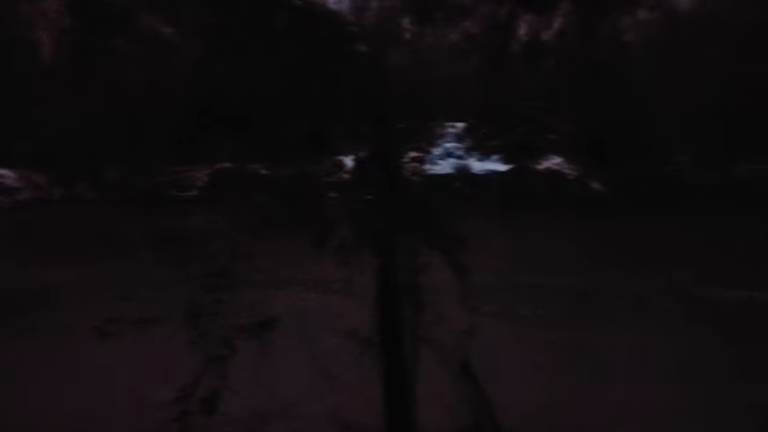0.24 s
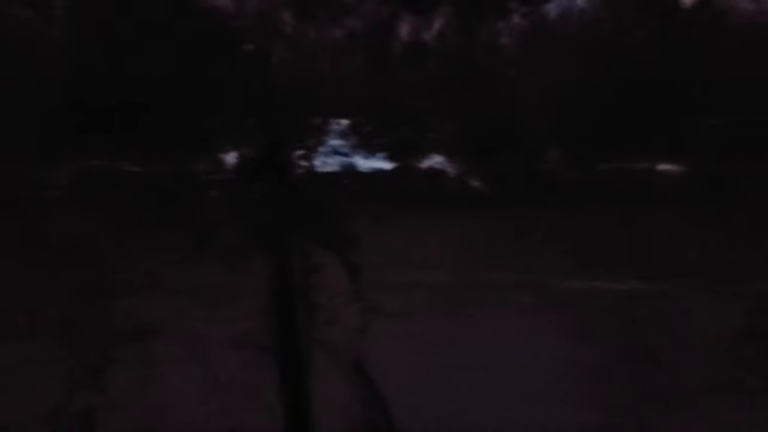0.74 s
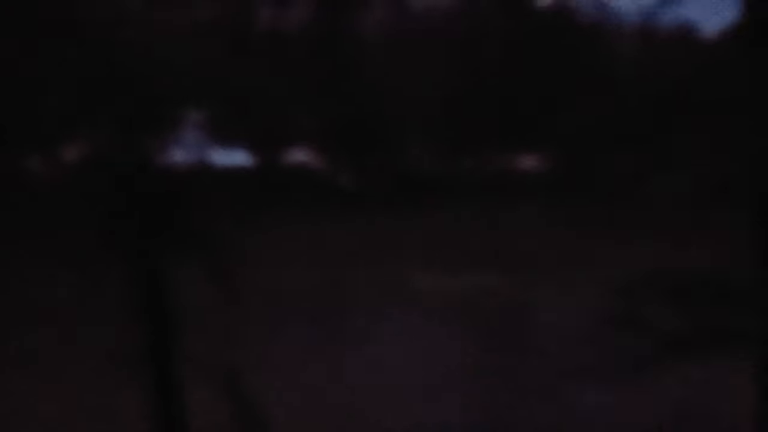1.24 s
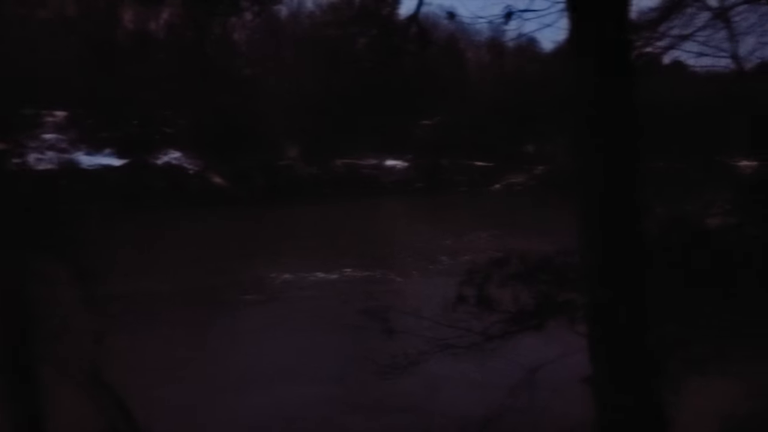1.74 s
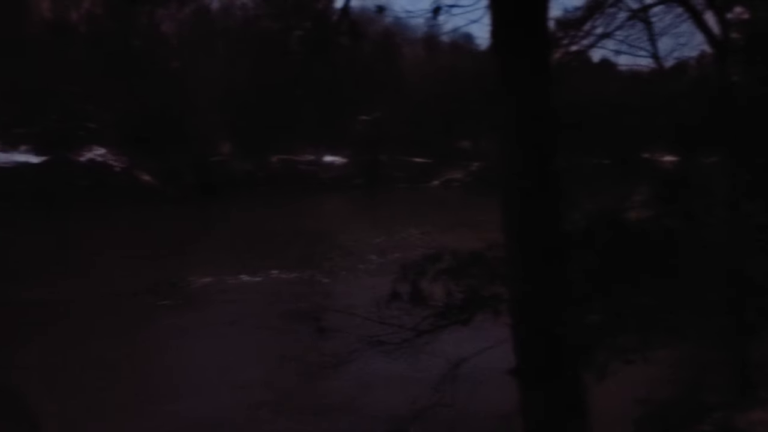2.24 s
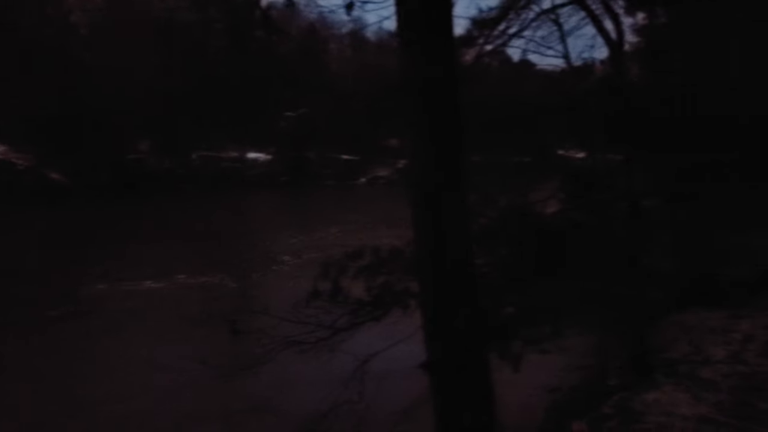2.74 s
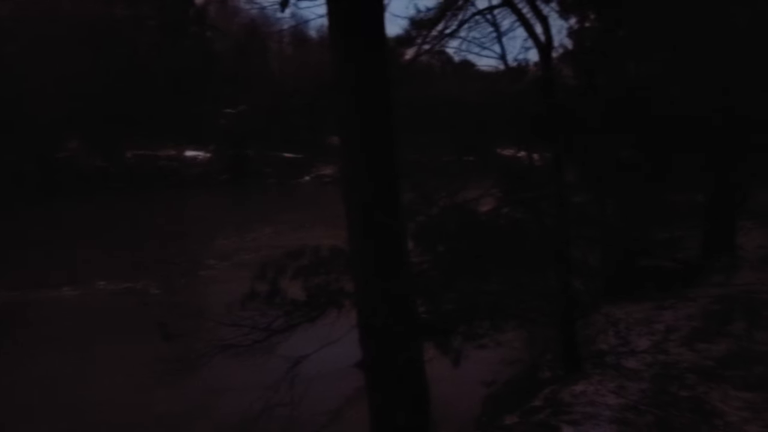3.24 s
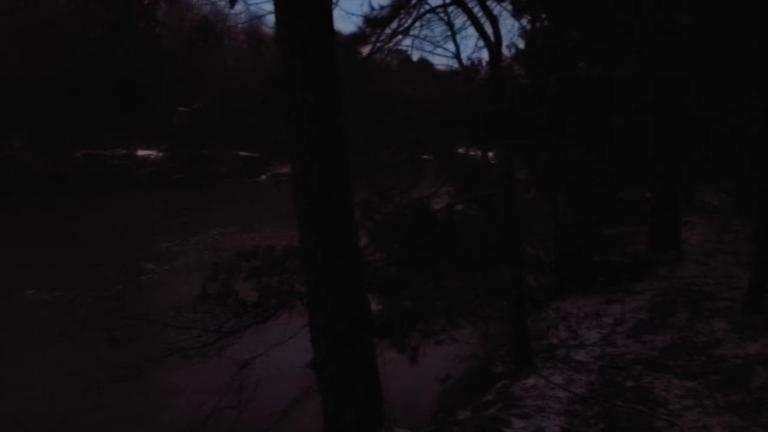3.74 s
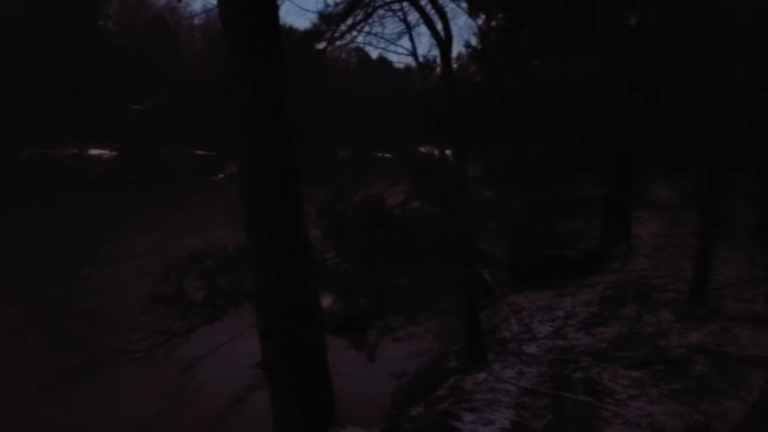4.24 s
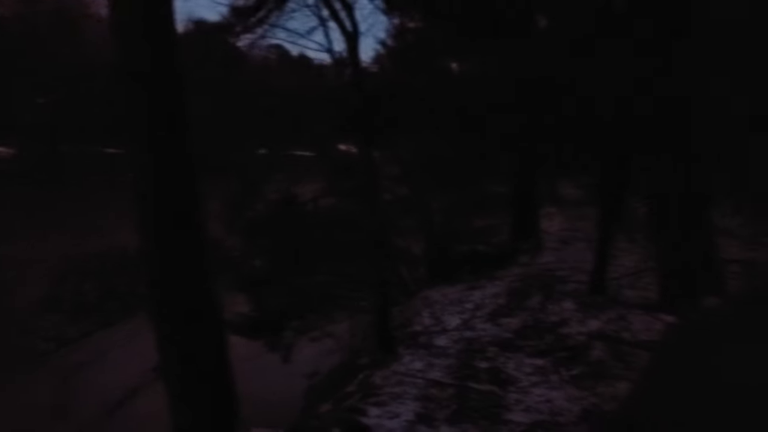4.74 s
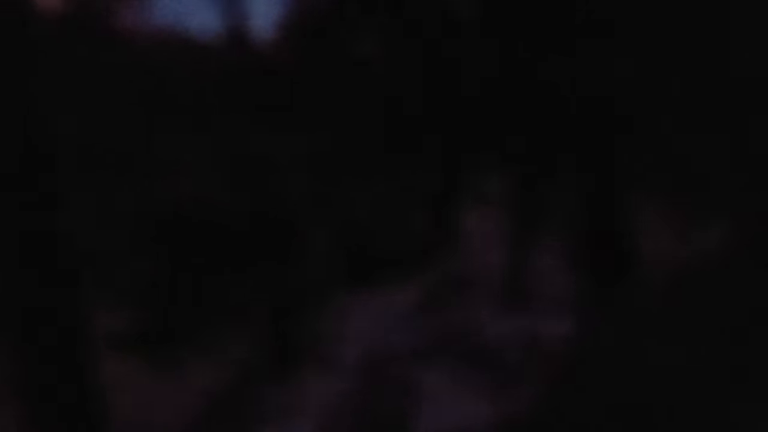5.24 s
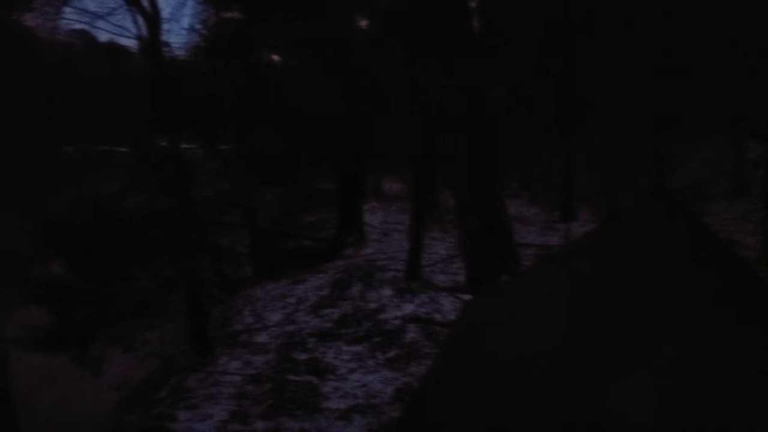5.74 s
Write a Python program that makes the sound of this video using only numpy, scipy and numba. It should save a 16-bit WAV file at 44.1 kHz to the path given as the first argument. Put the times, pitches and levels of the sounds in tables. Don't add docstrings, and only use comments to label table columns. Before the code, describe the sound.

Light sleet hisses steadily in dusk woods, with fine icy ticks and soft drops on fabric, and two sharp pellet cracks near the start and end.

```python
import sys
import numpy as np
from scipy import signal
from scipy.fft import rfft, irfft
from scipy.io import wavfile
from scipy.ndimage import uniform_filter1d
from numba import njit

SR = 44100
rng = np.random.default_rng(int(sys.argv[2]) if len(sys.argv) > 2 else 0)


def dump(signal):
    limited = np.clip(np.atleast_2d(signal).T, -1, 1)
    pcm = np.round(limited * 32767).astype(np.int16)
    wavfile.write(sys.argv[1], SR, pcm)


def attenuation_scalar(level_db):
    decades = np.asarray(level_db, float) / 20
    return 10 ** decades


N = 264600

# time in seconds, level of the far wash in dB.
GUSTS = [(0.0, -70), (1.05, -73), (1.27, -72), (1.64, -74.5), (1.94, -70.5), (2.07, -75), (2.31, -77.5),
         (2.61, -74.5), (2.81, -76), (3.48, -75.5), (3.96, -72.5), (4.36, -79.5), (5.11, -75),
         (5.25, -73.5), (5.53, -71.5), (6.0, -74)]
# frequency in Hz, density in dB per Hz.
HISS_SPECTRUM = [(760, -24), (1300, -21.5), (2230, -7), (3680, -3), (5750, -7), (7230, -4.5), (7850, -10),
                 (8710, -3), (10400, -5), (12000, 0.5), (15100, 0.5), (15600, -3)]
# frequency in Hz, density in dB per Hz.
RUMBLE_SPECTRUM = [(15, -42), (25, -7.5), (59, -0.5), (86, 3.5), (107, -2.5), (141, -11), (211, -10),
                   (267, -13), (321, -5.5), (390, -19.5), (700, -28), (910, -38), (1540, -120)]
# frequency in Hz, density in dB per Hz.
WASH_SPECTRUM = [(350, 2.5), (600, -2.5), (959, -6), (1310, -8), (2000, -3.5), (2600, -31), (4400, -120)]
# frequency in Hz, level in dB, t60 in seconds.
CANOPY_MODES = [(93.6, -24.5, 1), (163.7, -6.5, 0.15), (214, 1, 0.13), (229.2, -5, 0.16), (248.7, -1, 0.21),
                (309.1, -4, 0.16), (345.5, -7.5, 0.15), (424.6, -3.5, 0.061), (496, -8, 0.044),
                (882, -10, 0.018)]
# start in seconds, level in dB, push length in ms.
CANOPY_BLOWS = [
    (.349, -26, 0.87),
    (.358, -36.5, 3.3),
    (1.899, -50, 2.9),
    (5.841, -46.5, 1.9),
    (5.85, -43.5, 2.6),
    (5.862, -48.5, 3.3),
]
# start in seconds, peak in dB, ring in Hz.
ICE_TICKS = [(0.063, -35, 11700), (0.3974, -29, 15400), (0.4002, -26, 15700), (0.9704, -34, 13700),
             (1.0894, -33, 14500), (1.1593, -33, 15500), (1.489, -33, 15400), (1.8961, -41, 14400),
             (2.0258, -43, 12700), (2.0961, -33, 15700), (2.3101, -36, 15500), (2.3984, -29, 14800),
             (2.741, -27, 15400), (3.095, -34.5, 11800), (3.2219, -31, 11800), (3.417, -32, 9300),
             (3.703, -26, 13900), (3.7449, -33, 12200), (3.807, -31, 14400), (3.8706, -30.5, 11500),
             (3.9749, -28.5, 12700), (4.116, -32, 12400), (4.5042, -34, 15100), (4.5611, -33, 12800),
             (4.754, -39, 14500), (5.1123, -29, 15200), (5.1976, -30, 15400), (5.3712, -35, 10100),
             (5.7034, -31, 12100), (5.9105, -34, 11700)]
# start in seconds, peak in dB, ring in Hz.
WET_TAPS = [(0.2037, -41, 6970), (0.3481, -25, 6980), (0.6628, -40, 2030), (0.76, -42.5, 2390),
            (0.9143, -42, 5200), (0.927, -37, 3850), (0.9924, -40, 2390), (1.2416, -40, 5500),
            (1.5715, -36, 6050), (1.7948, -37.5, 3600), (2.3112, -37.5, 4350), (2.392, -38, 6050),
            (2.589, -42.5, 3540), (2.618, -42.5, 2130), (2.879, -37.5, 5400), (3.1717, -30.5, 3070),
            (3.689, -37.5, 3320), (3.8023, -38, 3530), (4.0794, -38.5, 3700), (4.3189, -34.5, 3970),
            (4.5171, -46, 3770), (4.6418, -39.5, 3400), (4.7591, -45, 4070), (5.3981, -36.5, 3500),
            (5.4203, -38, 2720), (5.4299, -38.5, 2710), (5.5178, -42, 5110), (5.6246, -44, 3430),
            (5.7165, -33.5, 3680), (5.8361, -23, 3700)]
# start in seconds, peak in dB, ring in Hz, broad crack level in dB.
MIC_STRIKES = [(.3464, -33, 13000, -46), (.3487, -10, 12500, -22), (.349, -21, 7200, -50),
               (.3489, -25, 2100, -50), (.3493, -18, 14000, -36), (.3505, -26, 13500, -36),
               (5.8374, -20, 11500, -5), (5.8374, -17, 13600, -50), (5.8377, -22, 15400, -50),
               (5.8437, -28, 14800, -30), (5.852, -27, 9800, -32), (5.852, -42, 3000, -50)]
# frequency in Hz, density in dB per Hz.
SNAP_SPECTRUM = [(290, -54), (500, -15), (1980, -15.5), (3820, -12), (5840, -17), (8060, -12), (13400, 1.5),
                 (15600, 0), (16500, -1)]
# start in seconds, peak in dB, ring in Hz.
CLOTH_PLOPS = [(0.349, -39, 894), (0.567, -42, 790), (0.662, -44, 1750), (0.992, -58, 832),
               (1.365, -48, 649), (1.379, -41, 603), (2.545, -53, 624), (2.583, -52, 821),
               (2.618, -57, 703), (3.111, -48, 641), (3.167, -47, 861), (3.802, -50.5, 1070),
               (4.079, -47.5, 600), (4.319, -50.5, 635), (4.759, -52.5, 689), (5.054, -49.5, 746),
               (5.089, -46.5, 700), (5.162, -53, 668), (5.198, -53, 600), (5.301, -52, 708),
               (5.398, -44.5, 910), (5.421, -45, 738), (5.455, -44, 732), (5.645, -54, 724),
               (5.661, -42.5, 1790), (5.717, -43, 1160), (5.822, -45.5, 969), (5.836, -37, 1670)]
# start in seconds, peak in dB, ring in Hz, t60 in seconds.
HEAVY_THUDS = [(3.171, -27.5, 96, 0.052), (3.167, -42, 468, 0.053), (3.17, -39, 850, 0.018),
               (5.197, -29.5, 400, .02), (5.2, -36.5, 145, 0.032), (5.199, -44, 1230, 0.0071),
               (4.079, -47, 1380, .01), (1.5, -46, 75, .15), (5.7, -46, 150, 0.036), (.385, -50, 67, 0.68),
               (.9275, -32, 4000, .012), (3.173, -36, 2400, .006), (1.9, -46, 200, 0.42),
               (5.86, -41.5, 325, 0.13), (.352, -31, 151, 0.096)]


def level(x, db):
    return x * attenuation_scalar(db) / np.sqrt(np.mean(x ** 2))


def colour(x, spectrum):
    hz, db = np.transpose(spectrum)
    log_hz = np.log(np.arange(N // 2 + 1) * SR / N + 1)
    gain_db = np.interp(log_hz, np.log(hz), db, db[0] - 28, db[-1] - 5.0)
    cepstrum = irfft(np.log(attenuation_scalar(gain_db)), N)
    cepstrum[1:N // 2] *= 2
    cepstrum[N // 2 + 1:] = 0
    return irfft(rfft(x) * np.exp(rfft(cepstrum)), N)


@njit
def rings(start_s, hz, t60_s, size, rise):
    out = np.zeros(N + SR)
    for k in range(len(start_s)):
        first = int(start_s[k] * SR)
        turn = np.exp(2j * np.pi * hz[k] / SR - np.log(1000) / (t60_s[k] * SR))
        soften = np.exp(-1 / (rise * t60_s[k] * SR + 1e-9))
        z, lag = size[k] + 0j, 1.
        for j in range(int(t60_s[k] * SR)):
            z *= turn
            lag *= soften
            out[first + j] += z.imag * (1 - lag)
    return out[:N]


def walk(rate_hz):
    hold = int(SR / rate_hz)
    steps = np.repeat(rng.standard_normal(N // hold + 1), hold)
    return 2.35 * uniform_filter1d(uniform_filter1d(steps, hold), hold)[:N]


def spikes(start_s, size):
    return np.bincount(np.minimum(start_s * SR, N - 1).astype(int), size, N)


def splash(blows, ms):
    keep = np.exp(-1000 / (ms * SR))
    tail = signal.lfilter([0, 1], [1, -keep], blows)
    return blows + 0.52 * tail * rng.standard_normal(N)


def sizes(u, scatter_db, most_db):
    return attenuation_scalar(np.minimum(-scatter_db * np.log(1 - u), most_db))


def shower(count, low_hz, top_hz, t60_s, scatter_db):
    u = rng.random((count, 5)).T
    size = sizes(u[2], scatter_db, most_db=8) * np.sign(u[3] - .5)
    decay_s = t60_s * (0.48 + 1.94 * u[4])
    hz = low_hz + (top_hz - low_hz) * u[1]
    return level(rings(u[0] * N / SR, hz, decay_s, size / np.sqrt(decay_s), 0.041), 0)


def hiss(db):
    far = attenuation_scalar(0.74 * walk(30)) * rng.standard_normal(N)
    grains = attenuation_scalar(-6.5) * shower(count=7000, low_hz=900.0, top_hz=17400.0, t60_s=0.0047, scatter_db=3.5)
    u = rng.random((900, 4)).T
    spatter = splash(spikes(u[0] * N / SR, sizes(u[1], scatter_db=4.5, most_db=9.5)), ms=3.8)
    crackle = splash(spikes(u[2] * N / SR, sizes(u[3], scatter_db=6.5, most_db=16)), ms=0.87)
    bright = np.diff(crackle, prepend=0)
    mix = far + grains + level(spatter, -4.5) + level(bright, -5.5)
    return level(colour(mix, HISS_SPECTRUM), 0.72) * attenuation_scalar(db)


def drone():
    hz, t60_s = np.array([92.2]), np.array([0.26])
    ring = rings(np.zeros(1), hz, t60_s, np.ones(1), 0.037)[:SR // 2]
    return level(signal.fftconvolve(rng.standard_normal(N), ring)[:N], -10.5)


def distance(rumble_db, wash_db):
    rumble = level(colour(rng.standard_normal(N), RUMBLE_SPECTRUM), 1.6) + drone()
    rumble = rumble * attenuation_scalar(rumble_db + 0.61 * walk(9))
    wash = level(colour(rng.standard_normal(N), WASH_SPECTRUM), 2.5)
    return rumble + wash * attenuation_scalar(wash_db + 1.3 * walk(35))


def canopy():
    push = level(shower(count=1500, low_hz=60., top_hz=494.0, t60_s=0.003, scatter_db=2.0), -63.5)
    for start_s, db, ms in CANOPY_BLOWS:
        first = int(start_s * SR)
        shape = np.hanning(int(ms * SR / 1000))
        push[first:first + len(shape)] -= attenuation_scalar(db + 43.5) * shape / shape.sum()
    hz, db, t60_s = np.transpose(CANOPY_MODES)
    sides = (-1.) ** np.arange(len(hz))
    modes = rings(0 * hz, hz, t60_s, sides * attenuation_scalar(db - 38.5), 0.037)[:SR // 2]
    return signal.fftconvolve(push, modes)[:N]


def stray(table, count, db, scatter_db, low_hz, top_hz):
    u = rng.random((count, 3)).T
    hz = low_hz * (top_hz / low_hz) ** u[2]
    return list(table) + list(zip(u[0] * N / SR, db + scatter_db * (u[1] - .5), hz))


def struck(table, t60_s, cycles, ring_db, crack_db):
    delay_s = .0012
    strike_s = np.array(MIC_STRIKES)[:, 0]
    clear = [row for row in table if np.abs(row[0] + delay_s - strike_s).min() > .001]
    start_s, db, hz = np.transpose(clear)
    start_s = start_s + delay_s
    ring = rings(start_s, hz, t60_s + cycles / hz, attenuation_scalar(db + ring_db), 0.019)
    return ring, spikes(start_s, attenuation_scalar(db + crack_db))


def echo(x, ms, db):
    return x + attenuation_scalar(db) * np.roll(x, int(ms * SR / 1000))


def ticks():
    hits = stray(ICE_TICKS, count=115, db=-39.5, scatter_db=1.5, low_hz=11500, top_hz=15700)
    ring, blows = struck(hits, t60_s=0.0014, cycles=8.5, ring_db=4.5, crack_db=-3.5)
    crack = np.diff(splash(blows, ms=1.5), prepend=0)
    return echo(ring, ms=.48, db=-14) + colour(crack, HISS_SPECTRUM)


def taps():
    hits = stray(WET_TAPS, count=40, db=-46.5, scatter_db=6.5, low_hz=2030, top_hz=7700)
    ring, blows = struck(hits, t60_s=0.0014, cycles=6.0, ring_db=5.5, crack_db=7.5)
    wet = signal.lfilter([.4], [1, -.6], splash(blows, ms=3.0))
    return ring + colour(wet, HISS_SPECTRUM)


def strikes():
    start_s, db, hz, crack_db = np.transpose(MIC_STRIKES)
    ring = rings(start_s, hz, .0014 + 0 * start_s, attenuation_scalar(db + 7), .12)
    snap = colour(spikes(start_s + .0001, attenuation_scalar(crack_db)), SNAP_SPECTRUM)
    return echo(ring + attenuation_scalar(8.5) * snap, ms=.48, db=-14)


def plops():
    hits = stray(CLOTH_PLOPS, count=10, db=-59.5, scatter_db=4, low_hz=620, top_hz=900)
    ring, blows = struck(hits, t60_s=0.00059, cycles=1.97, ring_db=10.5, crack_db=6)
    return ring + signal.lfilter([.2], [1, -.8], splash(blows, ms=1.5))


def thuds():
    start_s, db, hz, t60_s = np.transpose(HEAVY_THUDS)
    return -rings(start_s, hz, t60_s, attenuation_scalar(db + 1.5), 0.024)


def scene():
    t_s = np.arange(N) / SR
    gust_db = np.interp(t_s, *np.transpose(GUSTS))
    gust_db = gust_db - gust_db.mean()
    sleet = hiss(-51 + 0.077 * gust_db - 0.2544 * t_s)
    far = distance(rumble_db=-52.5 + 0.17 * gust_db, wash_db=-72 + 1.35 * gust_db)
    near = ticks() + taps() + strikes() + plops() + thuds()
    return (sleet + far + canopy() + near)[None]


def roll_off(x):
    return signal.sosfilt(signal.butter(12, 17110, fs=SR, output="sos"), x)


def record(dry):
    low_hz, top_hz = 32.2, 15950
    x = signal.sosfilt(signal.butter(2, low_hz, "high", fs=SR, output="sos"), dry)
    x = signal.sosfiltfilt(signal.ellip(6, .2, 24, top_hz, fs=SR, output="sos"), x)
    return roll_off(x)


dry = scene()
out = record(dry)
dump(out)
```